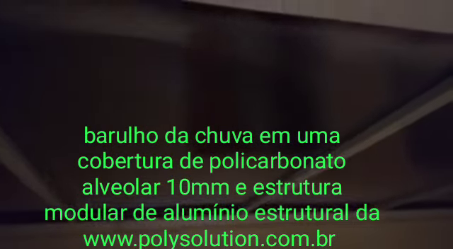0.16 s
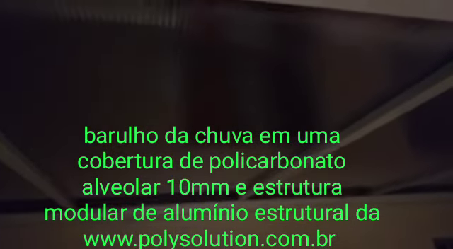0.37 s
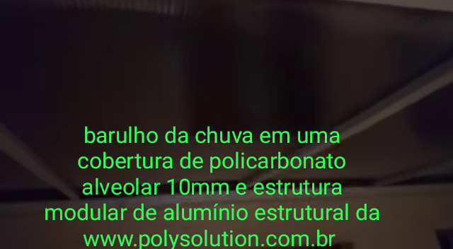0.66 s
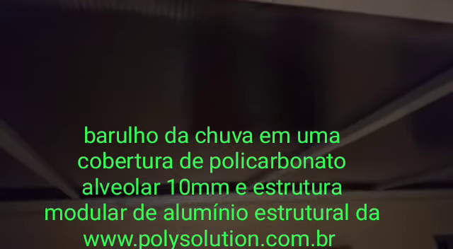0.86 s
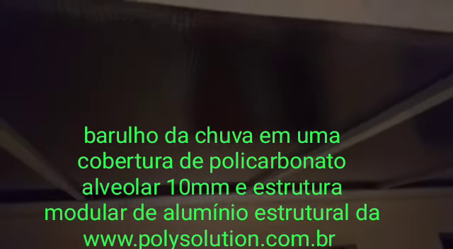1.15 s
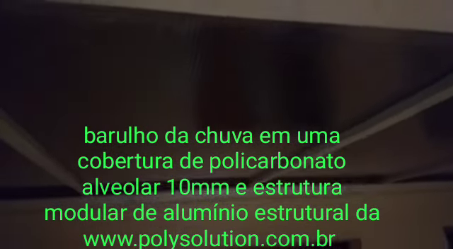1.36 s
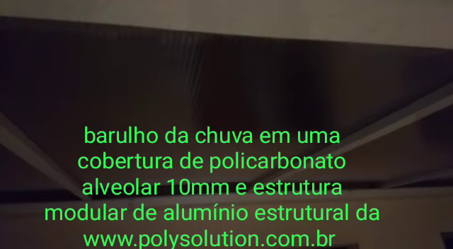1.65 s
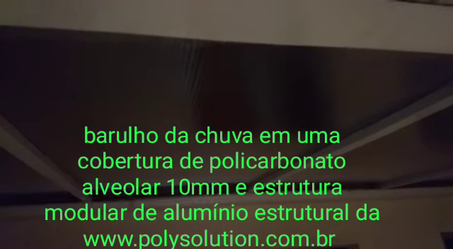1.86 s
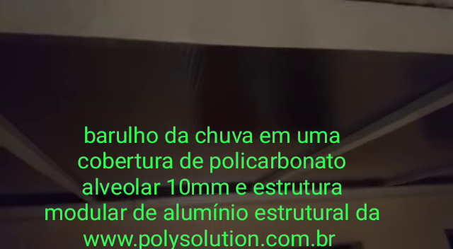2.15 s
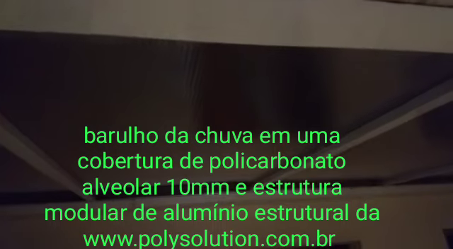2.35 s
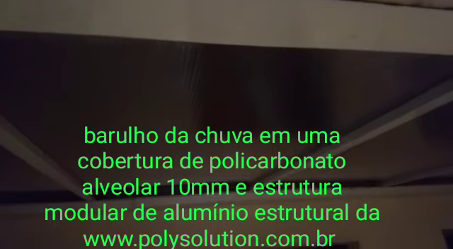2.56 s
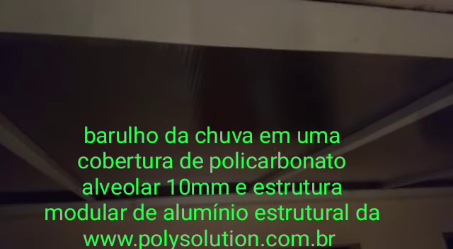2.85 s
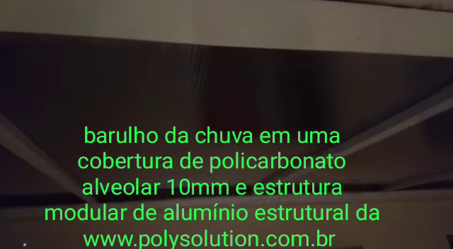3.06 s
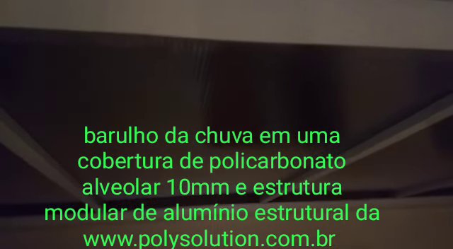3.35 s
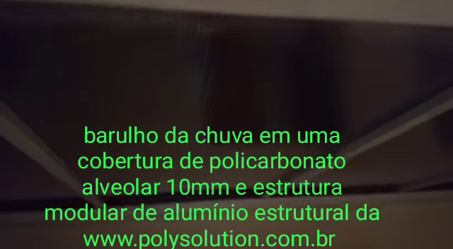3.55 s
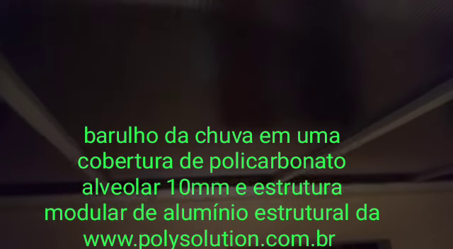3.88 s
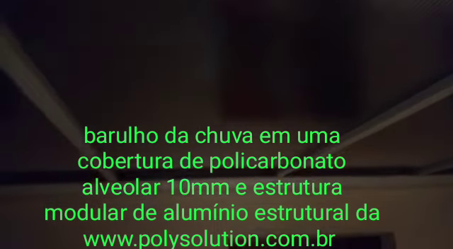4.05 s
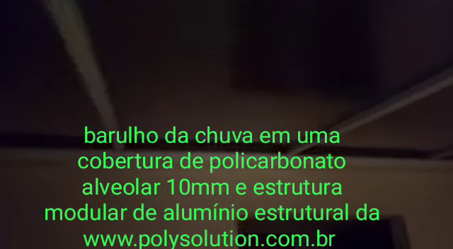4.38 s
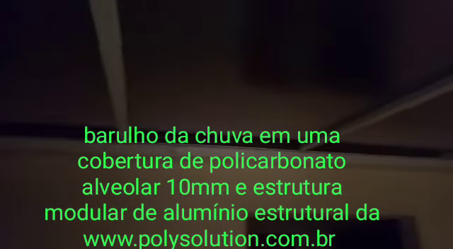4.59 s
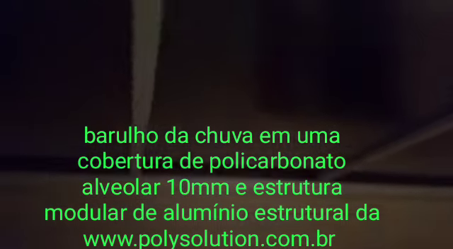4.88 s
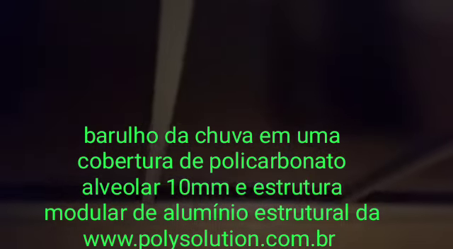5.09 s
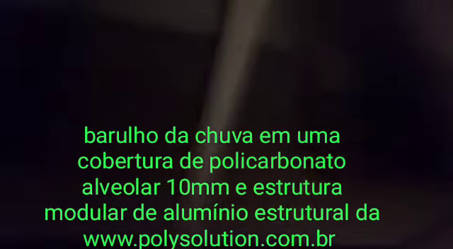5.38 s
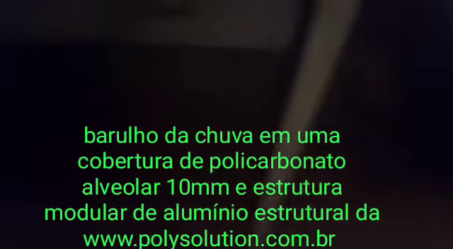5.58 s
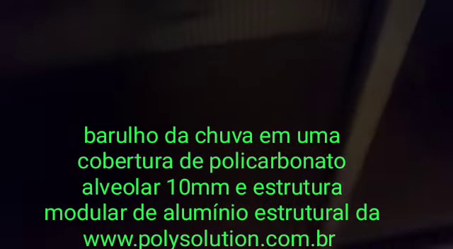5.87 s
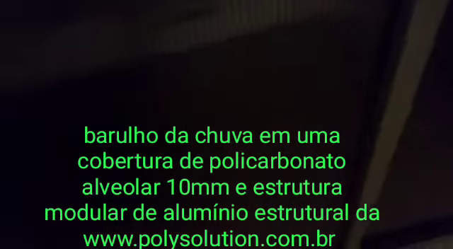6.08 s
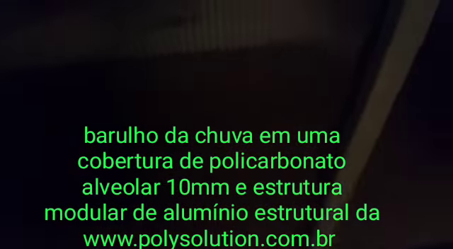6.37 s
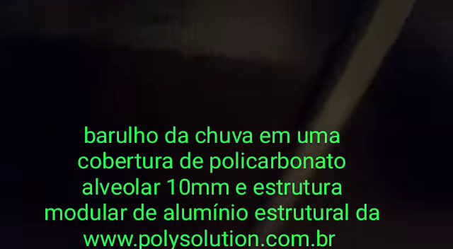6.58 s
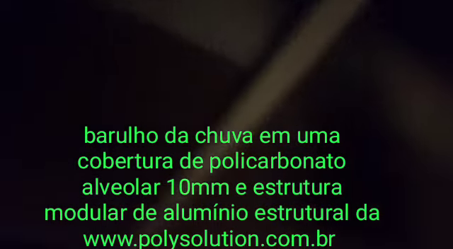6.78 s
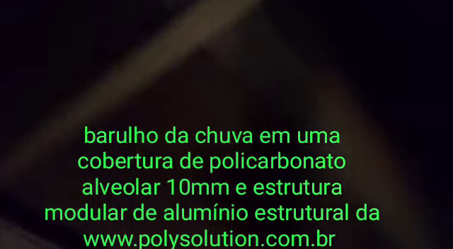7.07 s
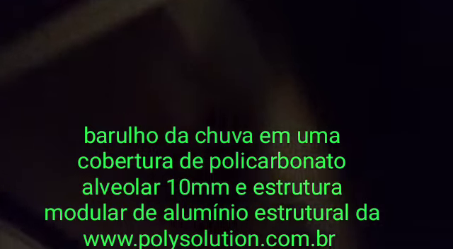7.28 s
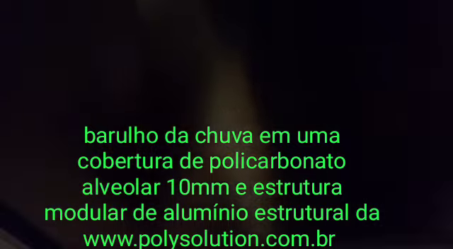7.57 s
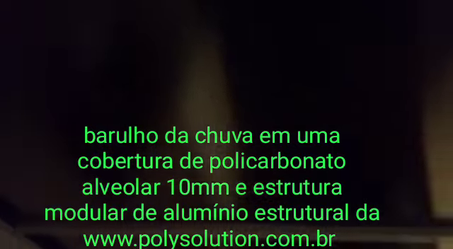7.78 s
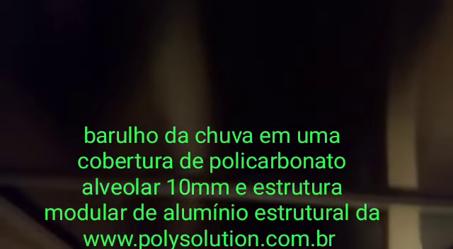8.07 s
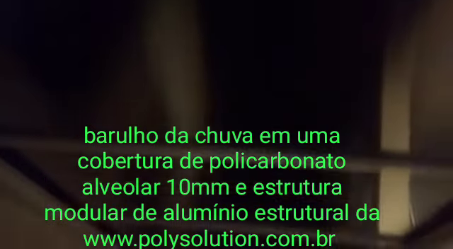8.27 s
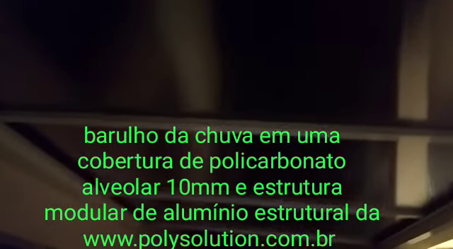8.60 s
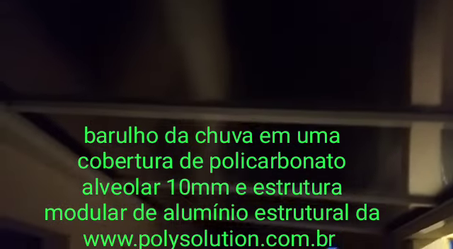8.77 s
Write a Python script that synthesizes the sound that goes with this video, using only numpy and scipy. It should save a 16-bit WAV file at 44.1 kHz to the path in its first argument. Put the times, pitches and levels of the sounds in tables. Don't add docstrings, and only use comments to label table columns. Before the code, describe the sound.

Under a plastic roof panel at night, rain drums without pause. A broad hiss and low drumming carry irregular small knocks, crisp taps and tiny splashes. Bright splashes are commonest early; hollow thuds crowd in just past the middle, when the rain is strongest. A slowly turning hand-held phone hears it close and wide, its automatic gain pumping gently.

```python
import sys
import numpy as np
from scipy import signal
from scipy.fft import rfft, irfft, next_fast_len
from scipy.io import wavfile

SR = 44100
rng = np.random.default_rng(int(sys.argv[2]) if len(sys.argv) > 2 else 0)


def master(y):
    cut = np.clip(np.atleast_2d(y).T, -1, 1)
    pcm = np.round(cut * 32767)
    wavfile.write(sys.argv[1], SR, pcm.astype(np.int16))


def volts_from_db(level):
    exponent = np.asarray(level, float) / 20
    return 10 ** exponent


N = 394254
STEP = 32
SIZE = next_fast_len(N + 4096)
HZ = np.arange(SIZE // 2 + 1) * SR / SIZE + 1e-3


def in_time(rows):
    s, *columns = np.transpose(rows)
    t = np.arange(0, N, STEP) / SR
    return [np.interp(t, s, column) for column in columns]


def held(slow):
    return np.repeat(slow, STEP, axis=-1)[..., :N]


def drift(rate_hz):
    r = np.exp(-2 * np.pi * rate_hz * STEP / SR)
    chance = rng.standard_normal(N // STEP + 2001)
    slow = signal.lfilter([1], [1, -2 * r, r * r], chance)[2000:]
    return slow / slow.std()


def drops(per_s, spread_db):
    when, size = rng.random((2, 8000))
    gaps_s = -np.log(1 - when) / per_s
    at = (np.cumsum(gaps_s) * SR).astype(int)
    size = np.minimum(-np.log(1 - size), 3.3)
    energy = np.bincount(at, volts_from_db(2 * spread_db * size), N)[:N]
    return energy / energy.mean()


# time in seconds, rain level before gain control in dB,
# turn (0 toward the open side, 1 toward the sheets).
RAIN_AND_TURN = [
    (0.0, -23.5, 0.48),
    (1.5, -22.5, 0.18),
    (2.5, -23.5, 0.0),
    (3.6, -24.5, 0.057),
    (4.4, -22.5, 0.085),
    (5.0, -22, 0.48),
    (5.8, -20, 0.86),
    (7.3, -22, 0.84),
    (8.1, -22, 1.2),
    (8.94, -22.5, 0.78),
]
# time in seconds, depth in dB.
DUCKS = [(0.451, 1.3), (0.641, 1), (0.706, 1.5), (0.97, 4), (1.15, 2.5), (1.2, 2.0), (1.821, 3), (2.188, 2),
         (2.352, 1.8), (2.624, 0.8), (3.248, 0.6), (3.357, 2), (3.662, 2), (4.657, 2), (4.929, 1.4),
         (4.986, 3), (5.62, 2.5), (6.046, 1.7), (6.231, 2.5), (6.59, 3), (7.752, 0.92)]
# centre in seconds, swell in dB.
FLURRIES = [(0.372, 1.5), (0.98, 1.5), (1.544, 1.5), (1.714, 1.7), (1.801, 1.9), (2.594, 2.2), (2.953, 1.3),
            (3.043, 1.52), (3.205, 1), (3.978, 2.3), (5.161, 2.2), (5.443, 2), (5.996, 0.5), (6.223, 2.62),
            (6.488, 1.8), (6.583, 2.1), (6.817, 2.0), (7.054, 2.5), (7.111, 1), (7.181, 1.5), (7.283, 1),
            (7.363, 2.0), (7.613, 2.5), (8.296, 2.2), (8.59, 0.9), (8.927, 1.5)]


def rain_db():
    recover_s, flurry_s = 0.3, 0.024
    t = np.arange(0, N, STEP) / SR
    ducked = sum(db * np.exp(-np.abs(t - s) / recover_s) * (t > s) for s, db in DUCKS)
    flurries = sum(db * np.exp(-.5 * ((t - s) / flurry_s) ** 2) for s, db in FLURRIES)
    return in_time(RAIN_AND_TURN)[0] + flurries - ducked


def diffuse_air():
    port_gap_m, sound_m_per_s = 0.13, 343
    alike = (1 - .004) * np.sinc(2 * HZ * port_gap_m / sound_m_per_s) * np.exp(-(HZ / 2000) ** 2)
    shares = np.sqrt(np.clip([1 + alike, 1 - alike], 0, 2) / 2)
    mid, side = rfft(rng.standard_normal((2, N)), SIZE) * shares
    return irfft(np.array([mid + side, mid - side]), SIZE)[:, :N]


# frequency in Hz, density in dB per Hz.
ROOF = [(25, -5), (55, -13.5), (85, 5.5), (170, 7), (400, 3.5), (1050, -4.5), (2100, -5.5), (3150, 0.5),
        (4300, -12), (5500, -7), (6700, -4), (8700, -15), (11000, -10.5), (14200, -7)]
# frequency in Hz, width in Hz, level over the roar in dB.
PANEL = [(86.5, 14, -13), (171, 36, 2.5), (417, 320, -4)]


def roof_colour():
    roof_hz, roof_db = np.transpose(ROOF)
    colour = volts_from_db(np.interp(np.log(HZ), np.log(roof_hz), roof_db))
    for hz, width, db in PANEL:
        colour = colour * np.sqrt(1 + volts_from_db(2 * db) / (1 + (2 * (HZ - hz) / width) ** 2))
    return colour


# time in seconds, left-right level of the spray in dB,
# nearness of single drops in dB.
FACING = [
    (0.0, -2.5, -1),
    (3.61, -1.5, 0),
    (5.0, -1.5, -1.5),
    (8.94, -1, -4),
]
# centre in Hz, own drops per second, drops over roar in dB, burst in ms,
# shading of the far port in dB per dB of facing.
PATTER = [(119, 35, -31, 6, 0.34), (345, 92, -9.5, 1.1, -1.1), (898, 200, -7, 0.67, -1.2),
          (1740, 250, 6, 6, 1), (3073, 250, -1.5, 0.78, 4), (4700, 350, 0, 2.1, 0), (6740, 220, 3, 1.2, 3),
          (9830, 250, -1, 0.87, 4.5), (13700, 220, -1, 0.54, 6.5)]
TURN_AT_HZ = [120, 343, 890, 3100, 6000, 14000]
# level at turn 0 in dB, gain over the turn in dB.
TURN_DB = [(-1, 1.5), (-2, 4), (-0.75, 1.04), (.5, -1.5), (0.16, -.5), (-0.55, -3.5)]


def patter():
    level = rain_db()
    turn = in_time(RAIN_AND_TURN)[1]
    turn_db = np.array([start_db + gain_db * turn for start_db, gain_db in TURN_DB])
    facing, near = in_time(FACING)
    anchors, centres = np.log(TURN_AT_HZ), np.log(np.array(PATTER)[:, 0])
    air, common, out = diffuse_air(), drops(150, spread_db=5.5), 0
    for k, (hz, per_s, drop_db, ms, shade) in enumerate(PATTER):
        fade = np.exp(-1000 / (ms * SR))
        hits = 0.42 * common + 0.5 * drops(per_s, spread_db=5.0)
        strength = volts_from_db(2 * (drop_db + near))
        bursts = signal.lfilter([1 - fade], [1, -fade], hits + 1e-9) * held(strength)
        swell = np.sqrt(1 + bursts * np.array([[.6], [1]]))
        weights = np.array([np.interp(np.log(hz), anchors, one) for one in np.eye(len(anchors))])
        colour_db = weights @ turn_db
        ports_db = shade * facing * np.array([[.7], [-.3]])
        drift_db = np.interp(hz, [300, 3000], [.2, 1.1]) * drift(39)
        gain = volts_from_db(level + colour_db + ports_db + drift_db) / np.sqrt(1 + strength)
        share = np.interp(np.log(HZ), centres, np.eye(len(PATTER))[k])
        out = out + rfft(air * swell * held(gain), SIZE) * share
    return irfft(out * roof_colour(), SIZE)[:, :N] * volts_from_db(7.5)


def knocks():
    push = -np.sqrt(drops(70, spread_db=3.5)) * held(volts_from_db(rain_db() - 18.5))
    r = volts_from_db(-60 / (0.00073 * SR))
    w = 2 * np.pi * 1300 / SR
    pulse = signal.lfilter([0, np.sin(w)], [1, -2 * r * np.cos(w), r * r], push + 1e-18)
    return np.array([.9 * np.roll(pulse, 6), pulse])


def add_ring(out, s, db, hz, t60, far_db):
    t = np.arange(int(t60 * SR)) / SR
    onset = 1 - np.exp(-t * hz * 0.8)
    ring = volts_from_db(db - 60 * t / t60) * onset * -np.sin(2 * np.pi * hz * t)
    for port, gain, lag in ((0, volts_from_db(far_db), 9), (1, 1, 0)):
        at = min(round(s * SR) - 8 + lag, N - len(t))
        out[port, at:at + len(t)] += gain * ring


# time in seconds, peak in dB, pitch in Hz.
THUDS = [(0.055, -23, 767), (0.262, -18, 816), (0.988, -24.5, 818), (1.38, -17, 781), (2.169, -22, 821),
         (2.271, -23, 1010), (2.947, -21, 756), (3.287, -13, 775), (4.022, -16, 842), (4.417, -15, 783),
         (4.726, -19, 818), (4.793, -27, 942), (5.149, -19, 939), (5.218, -14, 832), (5.36, -13, 751),
         (5.413, -13, 926), (5.456, -9, 751), (5.597, -14, 942), (5.727, -14, 1230), (5.87, -18, 805),
         (6.193, -18, 926), (6.292, -19, 778), (6.338, -19, 1010), (6.447, -16, 953), (6.577, -12, 929),
         (6.71, -25, 937), (6.856, -18, 867), (6.993, -12, 764), (8.631, -19, 826), (8.894, -14, 872)]


def thuds():
    out = np.zeros((2, N))
    for s, db, hz in THUDS:
        add_ring(out, s, db + 13.0, hz, .004, far_db=6)
        add_ring(out, s, db + 1.0, 1.65 * hz, .003, far_db=4)
    return out


# time in seconds, peak in dB, thud relative to the tap in dB.
TAPS = [(0.146, -15, -19), (0.2, -13, -17), (0.5157, -15, -10), (0.7941, -19.5, -9), (0.9647, -9.5, -17),
        (1.8008, -12, -5), (1.9887, -19, -27), (2.0887, -13.5, -8), (2.301, -10.5, -16), (2.6918, -16, -3),
        (2.8394, -15, -14), (2.9493, -33, -15), (3.1765, -13, -4), (3.766, -12, -17), (3.885, -13.5, -13),
        (3.9439, -17, -5), (4.051, -11.5, -13), (4.1076, -15, -13), (4.265, -18, -5), (4.3311, -15, -12),
        (4.4179, -11, -9), (4.465, -14, -12), (5.1405, -16, -8), (5.8277, -13.5, -7), (6.1609, -14, -9),
        (6.9039, -16, -20), (7.1605, -12.5, -9), (7.3417, -11, -13), (7.8425, -13, -19),
        (8.9303, -9.5, -13.5)]


def taps():
    out = np.zeros((2, N))
    for (s, db, thud_db), chance in zip(TAPS, rng.standard_normal(len(TAPS))):
        add_ring(out, s, db + 12.5, 3060 + 96 * chance, .005, far_db=-12)
        add_ring(out, s, db + thud_db + 11, 896, .006, far_db=5)
    return out


# time in seconds, peak in dB.
SPLASHES = [(0.629, -19), (0.6998, -18), (1.0096, -16), (1.1478, -16), (1.4656, -13), (1.6332, -15),
            (1.6681, -17), (1.8163, -10), (2.0657, -21), (2.174, -13), (2.3695, -18), (2.6344, -10),
            (2.6594, -19), (2.7392, -14.5), (2.7616, -16), (2.9342, -16.5), (3.0091, -15), (3.052, -16),
            (3.2445, -17), (3.3508, -16), (3.3757, -17), (3.6092, -14), (3.6556, -12), (3.7444, -19.5),
            (3.9115, -21), (4.122, -13), (6.105, -20), (6.3954, -19), (7.3507, -16), (8.8608, -19)]


def splashes():
    out = np.zeros((2, N))
    for (s, db), chance in zip(SPLASHES, rng.standard_normal(len(SPLASHES))):
        body_db = -14 + .55 * db
        add_ring(out, s, 1.1 * db + 11.5, 14250 + 250 * chance, .0035, far_db=-10)
        add_ring(out, s, body_db + 7, 7200, .002, far_db=-7.5)
        add_ring(out, s, body_db + 3, 10000, .002, far_db=-8)
    return out


def scene():
    return patter() + knocks() + thuds() + taps() + splashes()


# frequency in Hz, gain 0-1, extra phase lag in radians.
CROSS = [(1100, .84, 0.0), (2190, .99, .08), (3250, .66, .15), (4390, .99, .1), (5480, .55, 0.0),
         (6580, .4, 0.0), (7680, .7, 0.0), (8780, .95, .03), (9880, .66, 0.0), (10980, .76, -.06),
         (12070, .67, .03), (13170, .58, .15), (14270, .43, .05), (15370, .72, 0.0)]


def widen(ports):
    lag_s = 1 / 2195
    hz, gain, lag = np.transpose(CROSS)
    phase = 2 * np.pi * HZ * lag_s + np.interp(HZ, hz, lag)
    cross = np.interp(HZ, hz, gain) * np.exp(-1j * phase)
    return ports - cross * ports[::-1]


def low_pass(x):
    return signal.sosfilt(signal.butter(12, 16230, fs=SR, output="sos"), x)


def record(dry):
    top_hz = 15480
    top = volts_from_db(np.interp(HZ, [top_hz, top_hz + 40, top_hz + 380, top_hz + 480], [0, -22, -28, -70]))
    bottom = 1 / (1 + (45 / HZ) ** 2)
    wide = irfft(widen(rfft(dry, SIZE)) * top * bottom, SIZE)[:, :N]
    return low_pass(wide)


dry = scene()
out = record(dry)
master(out)
```